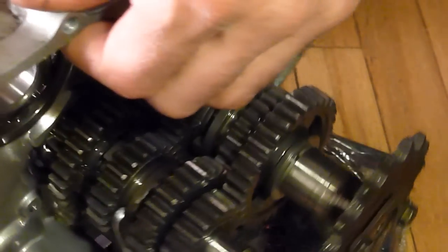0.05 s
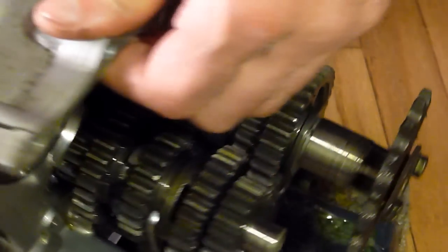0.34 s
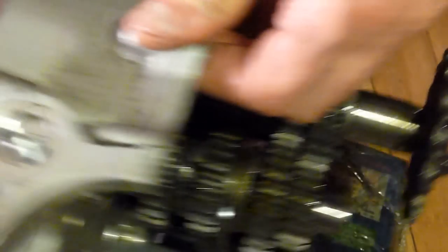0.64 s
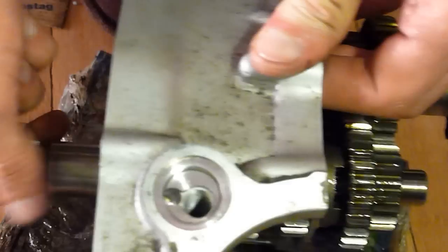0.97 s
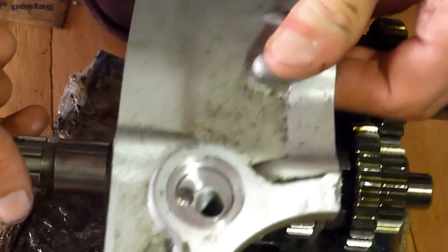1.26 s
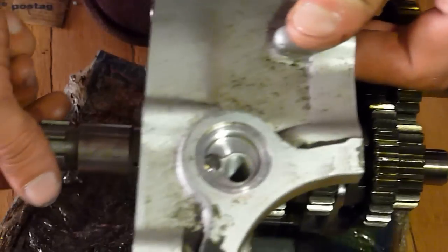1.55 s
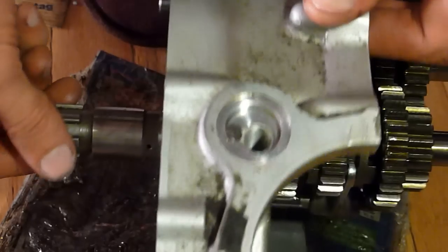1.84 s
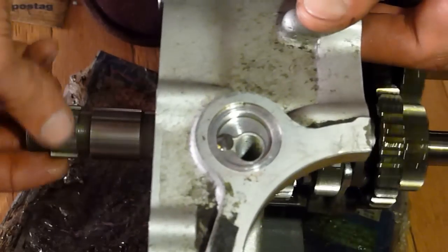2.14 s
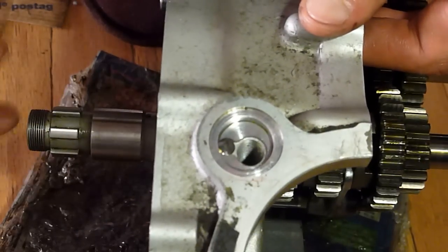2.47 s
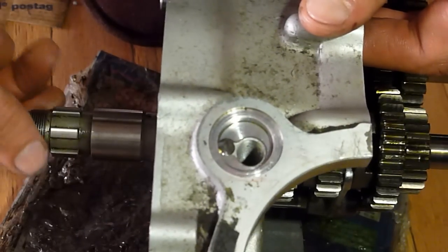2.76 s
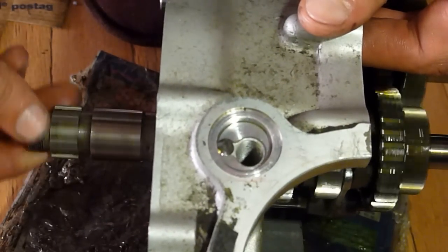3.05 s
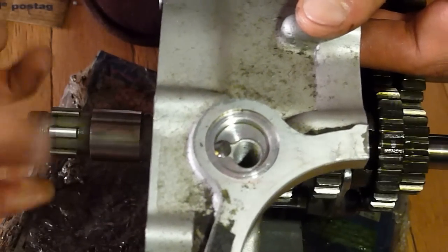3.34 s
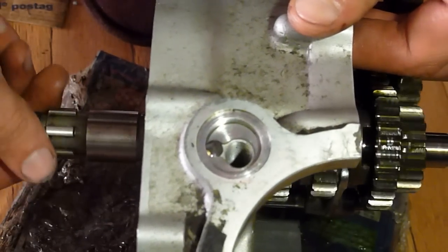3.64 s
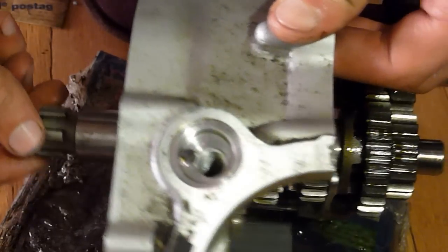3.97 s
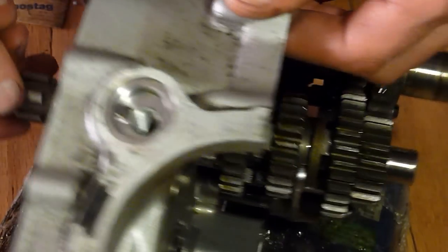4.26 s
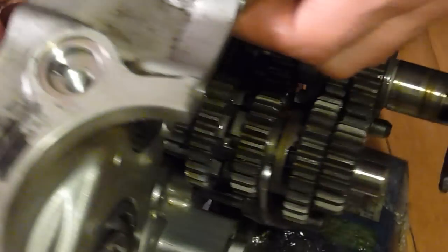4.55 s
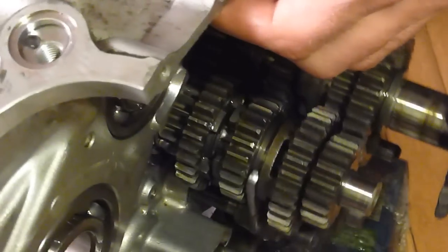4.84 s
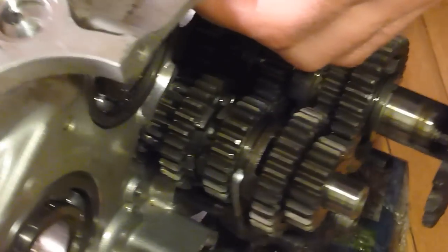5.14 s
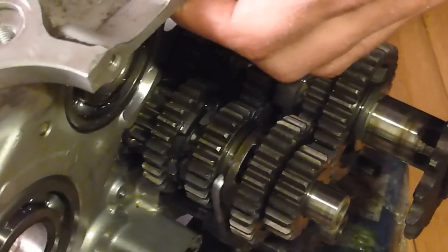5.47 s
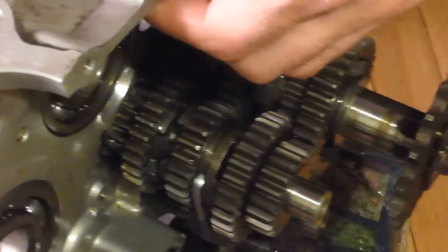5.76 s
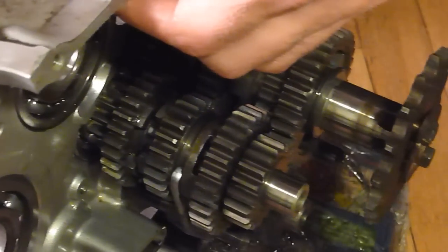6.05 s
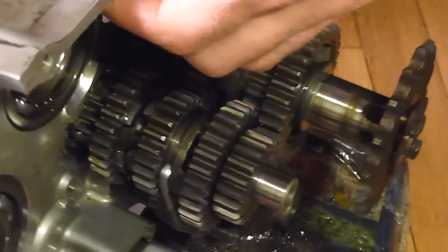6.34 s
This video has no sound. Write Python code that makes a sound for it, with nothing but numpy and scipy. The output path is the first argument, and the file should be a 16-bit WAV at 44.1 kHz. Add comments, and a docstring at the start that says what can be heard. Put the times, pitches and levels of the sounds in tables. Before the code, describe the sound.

An opened gearbox is worked by hand in a small garage, heard from close by. A steel shaft slides with a soft oily rasp and a few light ticks, then the shift snaps home with one hard, briefly ringing clank. The gears knock into mesh in a quick cluster. After that, gear teeth tick lightly and irregularly as the shaft turns, with more soft rasps over a low room hush.

```python
"""An opened gearbox is worked by hand on the wooden floor of a small garage, heard from close by.
Over a steady room noise, a shaft slides with an oily rasp and a few light ticks.
After one second the shift snaps home, steel on steel, with one hard clank; the gears then knock into mesh.
For the rest of the time the shaft is turned: gear teeth and dogs (the lugs that lock the gears)
tick through their backlash (the slack between them), with more soft rasps and one faint knock."""
import sys
import numpy as np
from scipy import signal
from scipy.fft import rfft, irfft
from scipy.io import wavfile
from scipy.ndimage import uniform_filter1d, minimum_filter1d

SR = 44100
rng = np.random.default_rng(int(sys.argv[2]) if len(sys.argv) > 2 else 0)


def inscribe(sig):
    """Save sig as 16-bit PCM at rate SR to the path in sys.argv[1].

    A 1-D sig is mono; a 2-D sig holds one channel per row.
    Samples are clipped to [-1, 1] before scaling.
    """
    pcm = np.round(np.clip(np.atleast_2d(sig).T, -1, 1) * 32767)
    wavfile.write(sys.argv[1], SR, pcm.astype(np.int16))


N = 291391

# the hand pushes shafts and gears along in their oil: start/s, length/s, rasp level/dB, hiss level/dB
HAND_STROKES = [(0.104, 0.26, -49, -54.5), (0.448, 0.56, -44.5, -48), (1.337, .26, -46, -52.5),
                (1.791, 0.17, -41, -48), (3.899, 0.47, -54, -58.5), (4.415, 0.2, -50, -55),
                (4.707, 0.21, -53, -57), (5.059, .22, -48, -56.5), (5.761, .11, -49.5, -58),
                (5.964, 0.1, -51.5, -63), (6.418, 0.14, -45.5, -48.5)]
# the shift snaps home, steel hitting steel four times in a few milliseconds: t/s, level/dB
SNAP_CONTACTS = [(.9833, 2), (.9841, 2.5), (.9853, 3), (.9879, -12)]


def from_db(db):
    """Turn decibels into a factor to multiply by."""
    return 10 ** (np.asarray(db) / 20)


def unit_energy(x):
    """Scale so that the squares add up to one."""
    return x / np.sqrt(np.sum(x ** 2) + 1e-20)


def unit_rms(x):
    """Scale so that the squares average one."""
    return unit_energy(x) * np.sqrt(len(x))


def at_hz(points, hz):
    """Read between the rows of a table, with octaves evenly spaced."""
    row_hz, values = np.transpose(points)
    return np.interp(np.log(hz + 1e-9), np.log(row_hz), values)


def through(x, response):
    """Let every sample of a sound set off a response, such as a ring or an echo."""
    return signal.fftconvolve(x, response)[:len(x)]


def colour(x, spectrum, size=4096):
    """Shape the tone by a table of f/Hz, level/dB, with a filter that never sounds ahead of a blow."""
    gains = from_db(at_hz(spectrum, np.fft.rfftfreq(size, 1 / SR)))
    cepstrum = irfft(np.log(gains))
    # folding the second half onto the first makes the filter respond as early as it can
    cepstrum[1:size // 2] *= 2
    cepstrum[size // 2 + 1:] = 0
    response = irfft(np.exp(rfft(cepstrum)))
    return through(x, unit_energy(response))


def fade(t60, size=N):
    """A smooth dying away; t60 is the time in seconds it takes to fall by 60 dB."""
    return np.exp(-np.log(1000) * np.arange(size) / (SR * t60))


def impulses(times, levels_db):
    """One sharp spike for each contact."""
    out = np.zeros(N)
    np.add.at(out, (np.asarray(times) * SR).astype(int), from_db(levels_db))
    return out


def burst(t60, size=8192):
    """Many close tones struck at once: noise that dies away."""
    return unit_energy(rng.standard_normal(size) * fade(t60, size))


def room_noise(level_db):
    """The steady, low hush of the room."""
    # tone of the hush: f/Hz, level/dB
    hush_colour = [(25, -14), (45, -2.5), (70, 1), (120, 0), (300, 0), (500, -4.5), (1000, -8.5),
                   (2000, -14), (4000, -19.5), (6300, -24), (8000, -31.5), (9000, -39), (10000, -67.5)]
    return from_db(level_db) * colour(rng.standard_normal(N), hush_colour)


def garage_echo(x, build_s, size=32768):
    """A blur of echoes builds up quickly and dies away at its own rate in each octave."""
    # tone of the echo: f/Hz, level/dB
    echo_colour = [(60, 6), (200, 4.5), (500, -2), (900, 2.5), (1800, -5), (2700, 0), (4000, 2), (6500, -6),
                   (10000, 1.5)]
    # how long the echo lasts: f/Hz, t60/s
    echo_t60 = [(100, 0.59), (500, 0.36), (1500, 0.36), (4000, 0.33), (9000, 0.35)]
    hz = np.fft.rfftfreq(size, 1 / SR)
    noise_spectrum = rfft(rng.standard_normal(size))
    echo = np.zeros(size)
    for low_hz in 45 * 2. ** np.arange(8):
        octave = irfft(noise_spectrum * ((hz >= low_hz) & (hz < 2 * low_hz)))
        echo += octave * fade(at_hz(echo_t60, low_hz * np.sqrt(2)), size)
    echo *= 1 - np.exp(-(np.arange(size) / SR / build_s) ** 2)
    return through(x, unit_energy(colour(echo, echo_colour)))


def case_ring(along_shaft=False, size=22050):
    """Gears and case ring after a blow; where it lands sets the strength of each tone."""
    # their natural tones: f/Hz, level struck on the teeth/dB, level struck along the shaft/dB, t60/s
    case_tones = [ (195.8, -9, -8, 0.22), (358, -16, -18, 0.13), (414.6, -9, 1, 0.17), (462, -11, 1, 0.074),
                  (627, -3, 0.5, 0.07), (659, -9, -1, 0.12), (882, -8.5, -17, 0.088),
                  (982, -5.5, -25, 0.092), (1104, -1, -11, 0.068), (1233, -1, 0, 0.061),
                  (1570, -21, -19, 0.092), (1632, -32, -6, .3), (1670, -21, -3, .26), (1958, -27, -9, .33),
                  (2535, -30, -12, .3), (2702, -16, -14, .14), (2336, -8.5, -18, 0.049),
                  (3616, -15.5, -18, 0.079), (3970, -20, -17, 0.076), (5440, -32, -27.5, 0.054),
                  (5900, -40, -25, .2)]
    t = np.arange(size) / SR
    ring = np.zeros(size)
    for hz, teeth_db, shaft_db, t60 in case_tones:
        strength = from_db(shaft_db if along_shaft else teeth_db)
        ring += strength * fade(t60, size) * np.sin(2 * np.pi * hz * t)
    return unit_energy(ring)


def friction(per_s, spread_db, smooth):
    """Rubbing surfaces: tiny catches of uneven size on top of a smooth noise."""
    sizes = from_db(spread_db * np.minimum(rng.exponential(1, N), 4))
    catches = (rng.random(N) < per_s / SR) * sizes * rng.choice([-1, 1], N)
    return unit_rms(unit_rms(catches) + smooth * rng.standard_normal(N))


def stroke_gain(start, length, steepness, attack_s=0.051, release_s=0.05):
    """One push takes hold, speeds up, sags and stops; steepness is how strongly loudness follows speed."""
    t = np.arange(N) / SR - start
    speed_db = np.interp(t / length, [0, 0.62, 1], [-7.5, 0, -3])
    moving = np.interp(t, [-attack_s, 0, length, length + release_s], [0, 1, 1, 0])
    return moving * from_db(steepness * speed_db)


def sliding(rasp_db, hiss_db, ring_db):
    """Steel slides on oily steel: a grainy rasp that sets the case ringing, and a finer hiss."""
    # tone of the rasp: f/Hz, level/dB
    rasp_colour = [(120, -9), (250, -4), (500, -3.5), (720, -1), (810, 3), (1100, -2), (1550, -2),
                   (1730, -5.5), (1880, 0.5), (2200, -3), (3200, -9), (5000, -20.5), (9000, -38.5)]
    # tone of the hiss: f/Hz, level/dB
    hiss_colour = [(1800, -20), (3000, 4), (4400, 3), (5200, 3), (6300, 3), (7300, -5), (8300, -16),
                   (9500, -23), (10200, -59)]
    rasp_pushes = sum(from_db(db) * stroke_gain(s, length, 0.92) for s, length, db, _ in HAND_STROKES)
    hiss_pushes = sum(from_db(db) * stroke_gain(s, length, 1.43) for s, length, _, db in HAND_STROKES)
    # between pushes the shaft still turns lightly
    rasp_gain = np.hypot(from_db(-62), rasp_pushes)
    hiss_gain = np.hypot(from_db(-67), hiss_pushes)
    rasp = colour(rasp_gain * friction(per_s=500, spread_db=3.0, smooth=1.0), rasp_colour)
    hiss = colour(hiss_gain * friction(per_s=980, spread_db=5.0, smooth=1.4), hiss_colour)
    ring = from_db(ring_db) * through(rasp, case_ring(along_shaft=True))
    return from_db(rasp_db) * (rasp + ring) + from_db(hiss_db) * hiss


def brushing_teeth(per_s=9, count=8):
    """Teeth brush by chance, louder in a stronger push. Gives rows of t/s, level/dB, f/Hz, t60/s."""
    rows = []
    for start, length, rasp_db, _ in HAND_STROKES:
        delays = (np.arange(count) + rng.random(count)) / per_s
        for delay, (strength, pitch) in zip(delays, rng.standard_normal((count, 2))):
            if delay < length:
                level_db = rasp_db + 21 + 3 * strength
                centre_hz = 2110 * 2 ** (0.84 * pitch)
                rows.append((start + delay, level_db, centre_hz, 0.051))
    return rows


def tooth_ticks(level_db, sharpness, edge, size=8192, count=128):
    """Each light touch is a sharp crack and a short, noisy ring around a pitch of its own."""
    # teeth and dogs touch: t/s, level/dB, centre f/Hz, t60/s
    touches = [(0.116, -27, 1310, .03), (0.3167, -14.5, 1500, 0.077), (0.318, -19, 5000, 0.036),
               (0.511, -21, 1550, 0.044), (0.612, -20, 1130, 0.085), (.7383, -18.5, 2660, 0.056),
               (.828, -19, 1420, .045), (0.9617, -19.5, 6200, 0.05), (1.485, -21, 2550, 0.051),
               (1.684, -17.5, 2680, .064), (1.917, -16, 3080, 0.042), (3.101, -19.5, 1450, 0.085),
               (3.3167, -22.5, 1290, .05), (3.9107, -14, 2000, 0.051), (4.0924, -23, 6300, 0.06),
               (4.5344, -22, 2930, 0.067), (4.8634, -26.5, 6300, .055), (4.9744, -21, 1550, 0.029),
               (5.1937, -22, 2500, .089), (5.3359, -24, 2400, 0.032), (5.3972, -27, 3470, 0.015),
               (5.6494, -21, 2540, 0.097), (5.7674, -21.5, 1660, 0.11), (6.0386, -19.5, 1550, 0.043),
               (6.181, -21, 2230, 0.057), (6.284, -19, 2560, 0.033), (6.4042, -18, 2180, 0.17),
               (6.5017, -12.5, 2120, .07), (6.537, -17.5, 3400, 0.07)]
    # how small steel parts give off a tick: f/Hz, level/dB
    tick_colour = [(300, -25), (850, 2), (1150, 2), (1440, 6.5), (1750, 0.5), (1950, 5), (2150, -1.5),
                   (2550, 1.5), (2850, 0.5), (3400, -4.5), (4800, -2), (6300, -1.5), (7600, -10),
                   (10000, -26)]
    out = np.zeros(N + SR)
    noises = rng.standard_normal((count, 2, size))
    for (s, db, hz, t60), (ring_noise, crack_noise) in zip(touches + brushing_teeth(), noises):
        ring = unit_energy(ring_noise * fade(t60, size))
        crack = edge * unit_energy(crack_noise * fade(t60=0.016, size=size))
        pitch_filter = signal.iirpeak(min(hz, SR / 4), sharpness, fs=SR)
        treble_cut = signal.butter(3, min(3 * hz, SR / 4), fs=SR)   # softer contacts lose their treble
        pitched = signal.lfilter(*pitch_filter, ring + crack)
        tick = colour(signal.lfilter(*treble_cut, pitched), tick_colour)
        start = int(s * SR)
        out[start:start + size] += from_db(db + level_db) * unit_energy(tick)
    return out[:N]


def rebounding(times, levels_db, loss_db=19.5, gap_s=0.0092, count=3):
    """Each blow bounces and lands again, weaker every time."""
    return sum(impulses(times + k * gap_s, levels_db - k * loss_db) for k in range(count))


def gear_knocks(ring_db, clatter_db, click_db, shaft_db, thud_db, thud_hz, backlash_s, top_hz):
    """A light touch takes up the slack, then the oil-cushioned blow lands and thuds into the floor."""
    # the gears knock into mesh: t/s, blow level/dB, steel click level/dB, thud level/dB
    knocks = [(1.531, -25.5, -37.5, -34.5), (1.574, -31, -54, -39), (1.597, -36.5, -62, -41),
              (1.697, -15, -42.5, -26), (1.7679, -9.5, -43, -30), (1.8005, -17, -37.5, -35),
              (4.537, -28, -49, -34)]
    # the crowd of short-lived tones between the main tones of the case: f/Hz, level/dB
    clatter_colour = [(80, -30), (200, -2), (420, 2), (560, -4), (800, -2.5), (1150, 8.5), (1500, -9.5),
                      (2600, -13), (4000, -23), (7000, -28), (10000, -63)]
    # the steel click on top of a knock: f/Hz, level/dB
    click_colour = [(500, -23), (1700, 36), (2700, -2), (4000, -3), (4800, 2), (6300, 19), (7500, -37),
                    (10000, -56)]
    times, levels_db, clicks_db, thuds_db = np.transpose(knocks)
    first_touches = impulses(times, levels_db - 12)
    landings = times + backlash_s
    blows = first_touches + rebounding(landings, levels_db)
    ring = from_db(ring_db) * through(blows, case_ring())
    clatter = from_db(clatter_db) * colour(through(blows, burst(t60=0.089)), clatter_colour)
    floorboards = fade(t60=0.044) * np.sin(2 * np.pi * thud_hz * np.arange(N) / SR)
    thud = from_db(thud_db) * through(rebounding(landings, thuds_db, loss_db=11), floorboards)
    # the knocks keep to a middle band, with little deep bass and no high treble
    softening = signal.butter(3, [165, top_hz], "band", fs=SR, output="sos")
    body = signal.sosfilt(softening, ring + clatter + thud)
    # where bare steel meets, it clicks and sets the shaft ringing
    steel_blows = rebounding(landings, clicks_db)
    click = from_db(click_db) * colour(through(steel_blows, burst(t60=0.07)), click_colour)
    shaft_ring = from_db(shaft_db) * through(steel_blows, case_ring(along_shaft=True))
    return body + click + shaft_ring


def snap_ring(clatter_db, ring_db):
    """The hardest contact of the snap leaves the case clattering and the shafts ringing."""
    # how the whole case passes the snap into the room: f/Hz, level/dB
    case_colour = [(70, -17), (140, -21), (280, -11), (380, -1.5), (650, 6.5), (950, -4), (1200, 1.5),
                   (1650, 3.5), (1850, -1.5), (2600, -8.5), (3200, -16), (4100, -11.5), (4700, -21),
                   (6700, -18.5), (10000, -56)]
    s, db = max(SNAP_CONTACTS, key=lambda contact: contact[1])
    blow = impulses([s], [db])
    clatter = colour(through(blow, burst(t60=0.026)), case_colour)
    ring = through(blow, case_ring(along_shaft=True))
    return from_db(clatter_db) * clatter, from_db(ring_db) * ring


def shift_snap(crack_db, swing_db, swing_hz, swing_t60):
    """The shift cracks home, each rebound pushing the other way."""
    # tone of that hard contact: f/Hz, level/dB
    crack_colour = [(60, -13), (140, 3), (250, 2.5), (480, 2.5), (660, 7), (820, -5.5), (1000, -2),
                    (1220, 9.5), (1550, 1.5), (2300, -28.5), (4000, 1.5), (4700, -23), (6200, -10.5),
                    (10000, -47)]
    blows = sum((-1) ** k * impulses([s], [db]) for k, (s, db) in enumerate(SNAP_CONTACTS))
    crack = from_db(crack_db) * colour(blows, crack_colour)
    # a slow, very low swing as the overloaded microphone recovers from the clank
    mic_swing = fade(swing_t60) * np.cos(2 * np.pi * swing_hz * np.arange(N) / SR)
    return crack + from_db(swing_db) * through(abs(blows), mic_swing)


def scene():
    """The gearbox, its echo and the room noise, added into one channel."""
    crack = shift_snap(crack_db=6.5, swing_db=-32.0, swing_hz=2.1, swing_t60=0.48)
    clatter, ring = snap_ring(clatter_db=9.5, ring_db=5.5)
    meshing = gear_knocks(ring_db=13.0, clatter_db=13, click_db=26.5, shaft_db=24.5,
                          thud_db=1.5, thud_hz=210, backlash_s=0.002107, top_hz=5030)
    ticks = tooth_ticks(level_db=-0.5, sharpness=0.84, edge=0.62)
    turning = ticks + sliding(rasp_db=-3.5, hiss_db=-2.5, ring_db=-16)
    into_room = (from_db(3) * clatter + from_db(-12.5) * ring
                 + from_db(-13) * meshing + from_db(-11.5) * turning)
    echo = garage_echo(into_room, build_s=0.0027)
    return (crack + clatter + ring + meshing + turning + echo + room_noise(level_db=-53))[None]


def gain_control(x, threshold_db, attack_s, hold_s, release_db_per_s):
    """A loud blow slips through, then the volume dips, waits and creeps back, holding up its tail."""
    power = uniform_filter1d(x[0] ** 2, size=88)   # averaged over 2 ms
    level_db = 10 * np.log10(np.maximum(power, 1e-12))
    half_hold = int(hold_s * SR / 2)
    needed_db = np.minimum(threshold_db - level_db, 0)
    held_cut_db = -minimum_filter1d(needed_db, 2 * half_hold + 1, origin=half_hold)
    recovery_db = release_db_per_s * np.arange(N) / SR
    cut_db = np.maximum.accumulate(held_cut_db + recovery_db) - recovery_db
    lag = np.exp(-1 / (attack_s * SR))
    smooth_cut_db = signal.lfilter([1 - lag], [1, -lag], cut_db)
    return x * from_db(-smooth_cut_db)


def record(dry, peak_limit=0.85, cutoff_hz=9900, offset=0.0069):
    """Automatic volume, rounded peaks, a steep treble cut and a small steady offset from zero."""
    held = gain_control(dry, threshold_db=-13, attack_s=0.0057, hold_s=0.038, release_db_per_s=57)
    rounded = peak_limit * np.tanh(held / peak_limit)
    treble_cut = signal.ellip(10, .2, 70, cutoff_hz, fs=SR, output="sos")
    return signal.sosfilt(treble_cut, rounded) + offset


dry = scene()
out = record(dry)
inscribe(out)
```